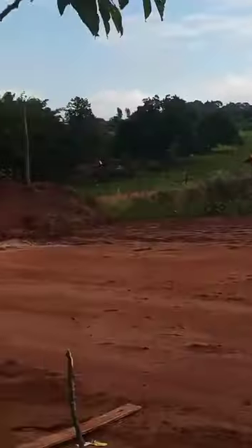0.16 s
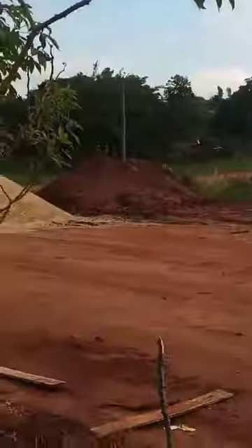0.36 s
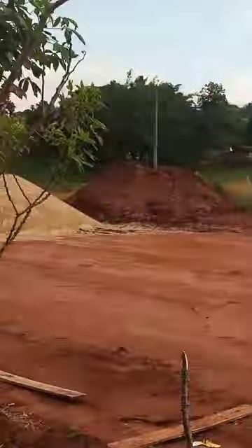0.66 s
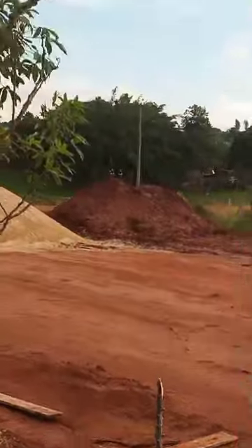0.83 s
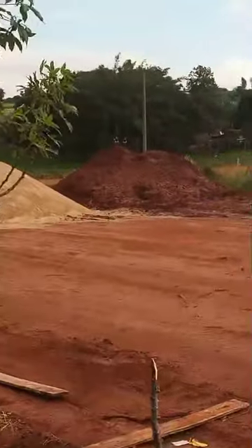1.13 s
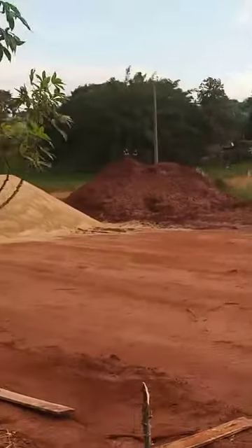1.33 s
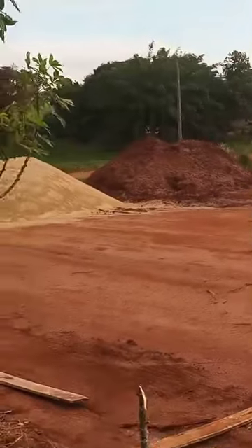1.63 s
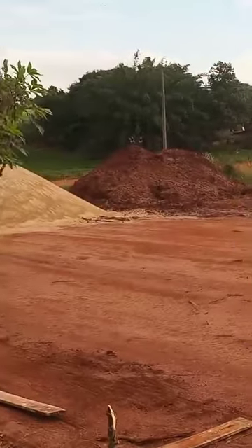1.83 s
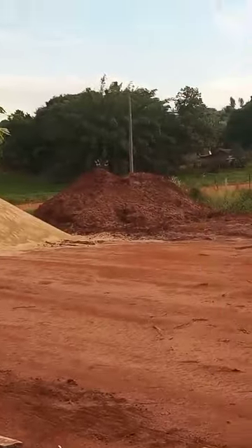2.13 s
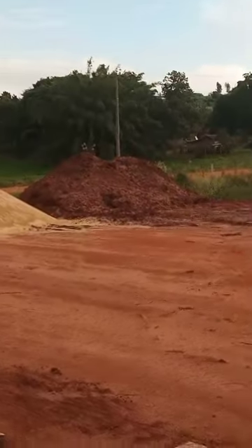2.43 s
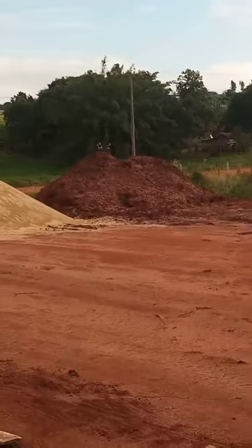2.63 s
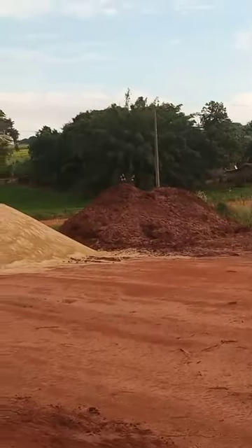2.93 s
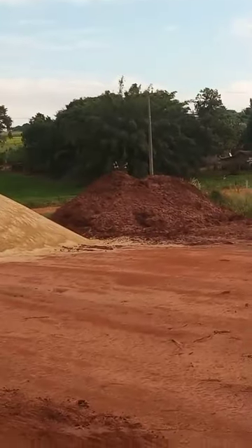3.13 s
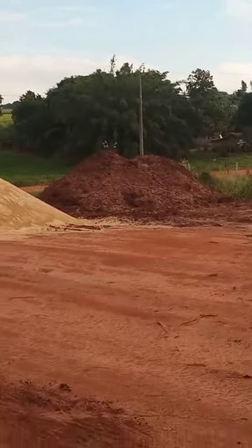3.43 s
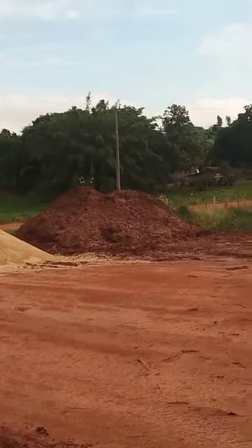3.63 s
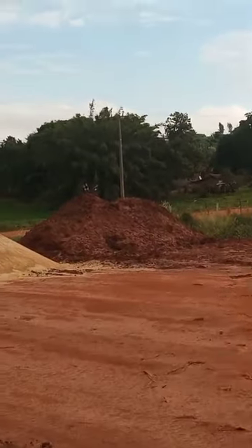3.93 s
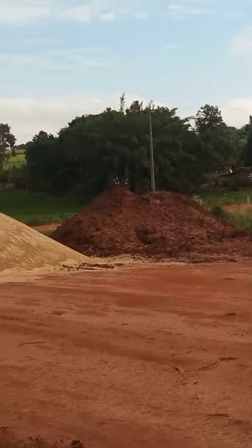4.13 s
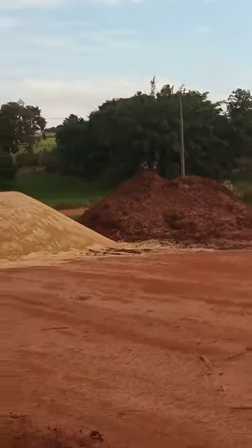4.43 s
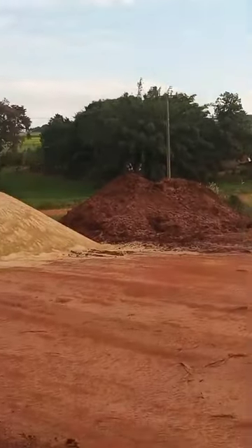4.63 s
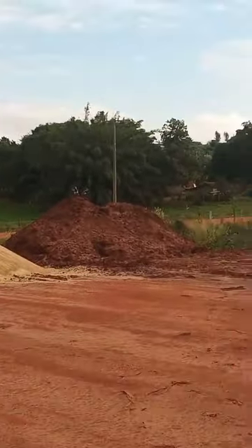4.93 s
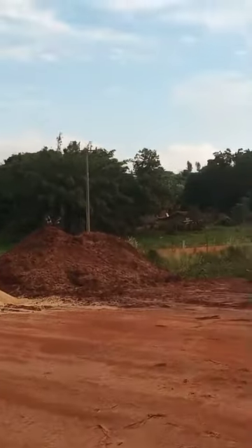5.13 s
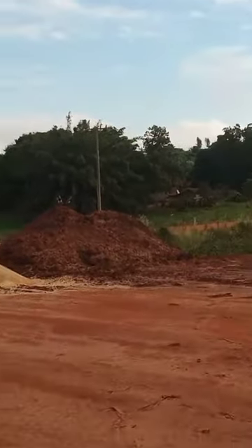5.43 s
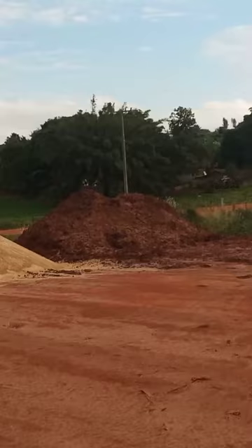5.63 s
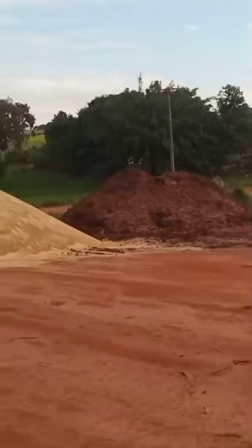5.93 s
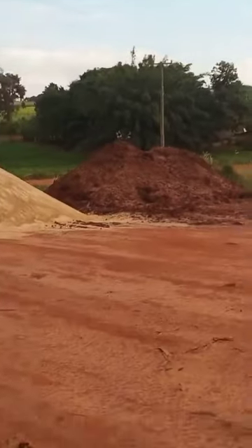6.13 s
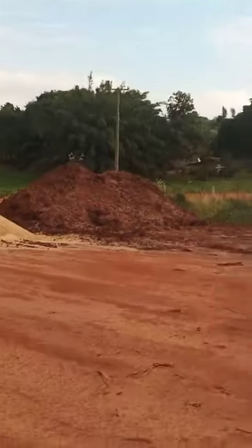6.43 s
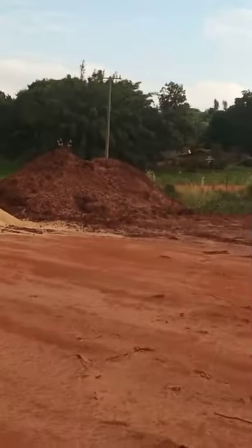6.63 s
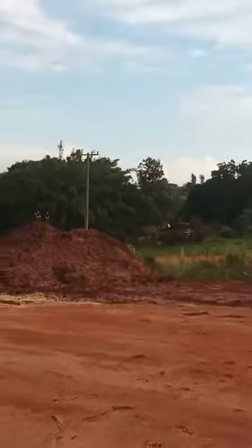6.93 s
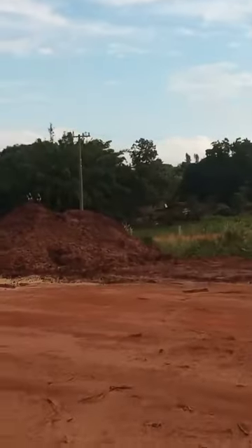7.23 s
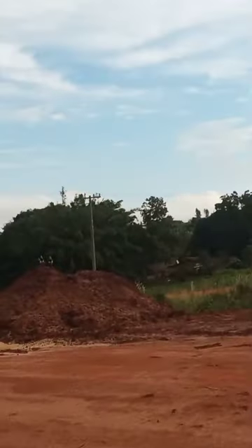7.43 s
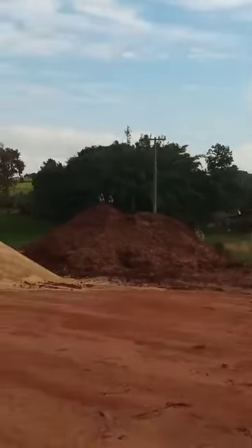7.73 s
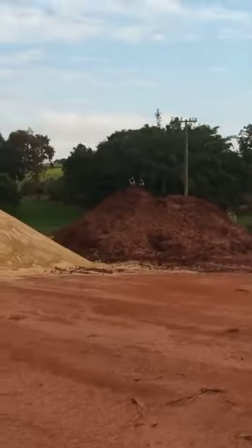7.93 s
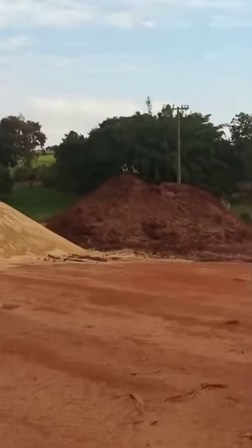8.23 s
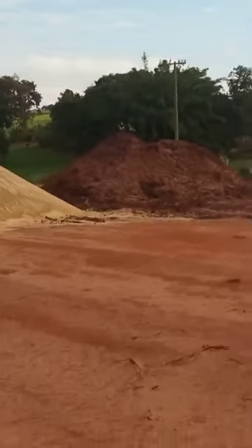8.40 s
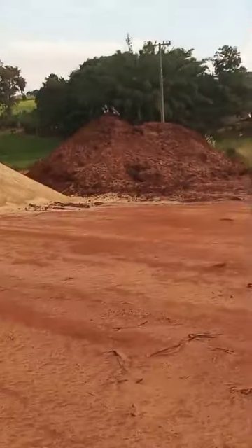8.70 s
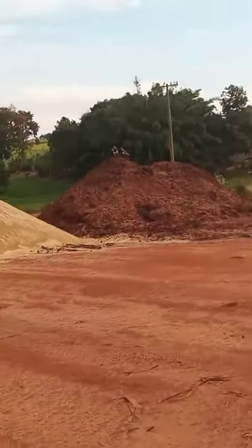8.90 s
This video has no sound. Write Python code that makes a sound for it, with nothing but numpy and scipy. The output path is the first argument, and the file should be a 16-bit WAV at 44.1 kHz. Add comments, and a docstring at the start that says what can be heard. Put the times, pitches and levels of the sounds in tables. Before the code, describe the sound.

A few lapwings scold from start to finish in an open outdoor space, over a very faint hiss of air. Their calls are short, shrill and reedy, about four a second, unevenly spaced and often overlapping. Each scoops upward, often with a rasp, then falls and breaks lower, leaving a light echo from the trees. Short, duller yelps fall between them from about 2.4 seconds. The calls grow gradually louder and peak around 7.7 to 8.3 seconds. Close by, feet faintly scuff and crackle on gritty earth at about 0.6, 2 and 6.7 seconds, with a soft dull knock near 7.4 seconds. Light wind buffets the microphone in low puffs around 3.9 and 4.5 seconds, then more noticeably from 8 seconds to the end at about 9 seconds. The birds stay the most prominent sound throughout.

```python
"""An open building site: a few lapwings scold, their shrill calls overlapping and echoing from the trees.
Each call is a stack of overtones coloured by throat and bill. It scoops up, stuttering into a rasp if
the lead-in is long, clears into a falling reedy note, then breaks to a lower register; short yelps
fall between. Close by, feet shift on gritty earth and a light wind buffets the microphone."""
import sys
import numpy as np
from scipy import signal
from scipy.fft import rfft, irfft, next_fast_len
from scipy.io import wavfile
from scipy.ndimage import uniform_filter1d, map_coordinates

SR = 44100
rng = np.random.default_rng(int(sys.argv[2]) if len(sys.argv) > 2 else 0)


def master_out(mix):
    """Clip the mix to full scale and print it as 16-bit PCM to the path in sys.argv[1]."""
    frames = np.transpose(np.atleast_2d(mix))
    ceiling = np.clip(frames, -1, 1)
    pcm = np.round(ceiling * 32767).astype(np.int16)
    wavfile.write(sys.argv[1], SR, pcm)


N = 399546

# scolding calls: t/s, lead-in/s, fall/s, top pitch/Hz, level/dB
SCOLDS = [(0.012, 0.031, 0.1, 1184, -32.5), (0.621, 0.046, 0.059, 1276, -31.5),
          (1.003, 0.014, .1, 1131, -32), (1.131, 0.027, 0.12, 1188, -41), (1.496, 0.03, .2, 1304, -41.5),
          (1.583, 0.0031, 0.029, 1256, -29), (1.752, 0.054, 0.12, 1237, -40),
          (2.135, 0.079, 0.068, 1288, -28.5), (2.16, 0.017, 0.091, 1145, -28.5),
          (2.631, 0.048, 0.12, 1183, -29.5), (2.703, 0.0028, 0.039, 1165, -25.5),
          (3.248, 0.022, 0.12, 1158, -30.5), (3.311, 0.032, 0.071, 1283, -29.5),
          (3.72, 0.031, .13, 1199, -29.5), (3.937, 0.077, 0.092, 1297, -29), (4.175, 0.026, .1, 1180, -28),
          (4.215, 0.03, 0.13, 1202, -27.5), (4.527, 0.11, 0.078, 1330, -27.5),
          (4.627, 0.094, 0.063, 1227, -26.5), (4.749, .035, 0.13, 1194, -26),
          (5.123, 0.047, 0.089, 1291, -27), (5.636, 0.046, 0.13, 1285, -30), (5.74, 0.034, 0.12, 1149, -28),
          (5.822, 0.036, .099, 1285, -29), (6.134, .06, .08, 1268, -26), (6.27, 0.022, .16, 1191, -27.5),
          (6.561, .07, .092, 1289, -29), (6.628, .051, 0.078, 1246, -25), (6.759, .039, .185, 1218, -28),
          (7.167, 0.087, .18, 1302, -29.5), (7.212, 0.051, 0.048, 1221, -23.5),
          (7.701, 0.055, 0.16, 1242, -24.5), (7.8, 0.056, 0.061, 1241, -18), (7.91, .09, 0.058, 1284, -33),
          (8.2, 0.039, 0.16, 1235, -23.5), (8.3, 0.061, 0.08, 1224, -23.5),
          (8.541, 0.094, 0.07, 1301, -29.5), (8.733, 0.036, 0.13, 1189, -26.5),
          (8.799, 0.057, 0.068, 1260, -25.5)]


def amp(db):
    """Decibels to amplitude."""
    return 10 ** (np.asarray(db) / 20)


def unit(x):
    """x at an rms of 1."""
    return x / np.sqrt(np.mean(x ** 2) + 1e-20)


def along(points, hz):
    """A curve through (f/Hz, value) points on a log frequency axis."""
    f, v = np.transpose(points)
    return np.interp(np.log(hz + 1), np.log(f + 1), v)


def wobble(rate, size):
    """A smooth random curve with `rate` knots a second."""
    knots = rng.standard_normal(int(size * rate / SR) + 4)
    return map_coordinates(knots, [np.arange(size) * rate / SR], mode="mirror")


def filtered(x, response):
    """Zero-phase EQ; `response` gives the gain at each frequency."""
    size = next_fast_len(len(x) + SR // 4)
    return irfft(rfft(x, size) * response(np.fft.rfftfreq(size, 1 / SR)), size)[:len(x)]


def noise(spectrum):
    """Noise of rms 1, coloured by (f/Hz, level/dB) points."""
    return unit(filtered(rng.standard_normal(N), lambda hz: amp(along(spectrum, hz))))


def add(track, start, sound):
    """Mix a sound in at `start` seconds."""
    part = track[max(round(start * SR), 0):][:len(sound)]
    part += sound[:len(part)]


def clock(length):
    """A time axis in seconds, at least 10 ms long."""
    return np.arange(int(max(length, .01) * SR)) / SR


def gate(t, rise, fall):
    """A linear fade in and out."""
    return np.clip(t / rise, 0, 1) * np.clip((t[-1] - t) / fall, 0, 1)


def calls(clear_rough=0.06, clearing_s=0.011, swell_db=-5, rasp_db=-2.5, dull_db=-3):
    """The voice swells and scoops up, rasping if that takes long, then clears into a falling note."""
    out = np.zeros(N)
    for start, lead, length, top_hz, top_db in SCOLDS:
        end_hz, fade_db, bright_db = strained_note(length, top_hz)
        t = clock(lead + length)
        onset = np.clip(1 - t / lead, 0, 1)
        fall = np.clip((t - lead) / length, 0, 1)
        pitch = top_hz * (1 - onset ** 2 / 9) + (end_hz - top_hz) * fall
        rasp_depth = np.clip(lead / 0.0152 - 2, 0, 1)  # lead-ins under 30 ms stay clean
        rasp = rasp_depth * np.clip((lead - t) / clearing_s, 0, 1)
        db = top_db - 1.5 + fade_db * fall + swell_db * onset ** 2 + rasp_db * rasp
        # even the clear note turns hoarse in patches
        hoarse = np.minimum(clear_rough * amp(13.3 * wobble(18.8, len(t))), .5)
        voice = syrinx(pitch, hoarse + rasp, bright_db + dull_db * np.maximum(rasp, onset))
        chop = 1 + rasp * (stutter(t) - 1)
        add(out, start, amp(db) * voice * chop * gate(t, 0.0026, 0.016))
    return out


def strained_note(length, top_hz, easy_hz=1145, strained_hz=1285, sag_hz_per_s=1520):
    """End pitch, fade and brightness: a higher call is more strained, so shriller and better held."""
    fade_db = np.interp(top_hz, [easy_hz, strained_hz], [-10, -3.5])
    bright_db = np.interp(top_hz, [easy_hz, strained_hz], [-3.5, 5])
    return top_hz - sag_hz_per_s * length, fade_db, bright_db


def syrinx(pitch, rough, bright_db, chaos=0.027, waver=0.00595, fading_db=6, count=13):
    """The bird's voice: roughness shakes the pitch and spreads each overtone into a narrow band."""
    size = len(pitch)
    shaken = pitch * (1 + waver * wobble(68.2, size) + chaos * rough * wobble(915, size))
    phase = 2 * np.pi * np.cumsum(shaken) / SR
    spread = np.minimum(rough, 1) / np.sqrt(2)
    voice = np.zeros(size)
    for k in range(1, count + 1):
        # each overtone swells and fades by itself, at random
        knots = rng.standard_normal(size // 1100 + 2)
        drift = np.interp(np.linspace(0, len(knots) - 1, size), np.arange(len(knots)), knots)
        db = bright_db * (k > 2) + fading_db / (1 + (k == 2)) * drift
        grain = np.sqrt(1 - spread ** 2) + spread * wobble(660, size)
        voice += amp(db) * grain * np.sin(k * phase + rng.uniform(0, 2 * np.pi))
    return np.sqrt(2) * voice


def stutter(t, first_hz=65, last_hz=115, depth_db=8):
    """Uneven bursts that quicken as the voice catches; each starts hard and dies."""
    rate = np.interp(t, [0, .05], [first_hz, last_hz]) * amp(2.64 * wobble(87, len(t)))
    bursts = amp(-depth_db * (np.cumsum(rate) / SR % 1))
    return unit(uniform_filter1d(bursts, size=60))


def breaks(drop_db=-6, fade_db=-10):
    """As a call runs out, the voice drops to a lower register and slides away."""
    out, t = np.zeros(N), clock(.055)
    slide = t / t[-1]
    for start, lead, length, top_hz, top_db in SCOLDS:
        end_hz, faded_db, _ = strained_note(length, top_hz)
        voice = syrinx(end_hz * (.74 - .17 * slide), rough=.15, bright_db=-6, count=8)
        db = top_db + faded_db + drop_db + fade_db * slide
        add(out, start + lead + length, amp(db) * voice * gate(t, .002, .008))
    return out


def yelps(gain_db=0.5):
    """Short calls whose pitch rises and falls in one arch; the lower ones are duller clucks."""
    # low-register calls: t/s, length/s, top pitch/Hz, level/dB
    cues = [(2.373, 0.061, 849, -35.5), (2.985, 0.057, 1019, -32), (3.065, .05, 950, -37),
            (3.318, 0.047, 1003, -34), (3.571, 0.065, 811, -30), (5.505, 0.059, 762, -30.5),
            (7.658, 0.064, 949, -35), (8.052, 0.072, 952, -35), (8.625, 0.054, 1086, -31),
            (8.897, 0.059, 1120, -31.5)]
    out = np.zeros(N)
    for start, length, top_hz, db in cues:
        t = clock(length)
        pitch = top_hz * (1 - .65 * (t / t[-1] - .4) ** 2)
        voice = syrinx(pitch, rough=0.27, bright_db=-9 + 0.0917 * (top_hz - 1000), count=9)
        add(out, start, amp(db + gain_db) * voice * gate(t, 0.0094, 0.017))
    return out


def catches(pitch_hz=1060, gain_db=5):
    """At the head of some calls the syrinx flutters for a moment and stops again."""
    # catches of the voice: t/s, level/dB
    cues = [(0.995, -36), (1.496, -31.5), (2.123, -38), (2.613, -36), (4.526, -28.5), (5.104, -32),
            (5.614, -35), (7.150, -30), (7.704, -32)]
    out, t = np.zeros(N), clock(0.014)
    for start, db in cues:
        voice = syrinx(np.full(len(t), pitch_hz), rough=.5, bright_db=-9)
        add(out, start, amp(db + gain_db) * voice * gate(t, 0.0075, 0.011))
    return out


def throat(voice):
    """Throat and bill resonate, most strongly near 2.4 kHz."""
    # formant curve: f/Hz, level/dB
    formants = [(500, -55.5), (1300, -22), (2000, -9), (2400, 0), (3000, -3.5), (3600, -10.5), (4200, -7),
                (5000, -8), (5600, -16), (6500, -10), (7300, -28), (8000, -46), (10000, -26.5),
                (12500, -54), (15300, -39)]
    return filtered(voice, lambda hz: amp(along(formants, hz)))


def trees(birds, predelay_s=.03, build_s=0.011):
    """The tree line sends back a diffuse, slowly dying echo."""
    # reverb time: f/Hz, t60/s
    decay = [(500, 0.67), (2400, 0.36), (6000, 0.67), (12000, 0.21)]
    hz, t, wash = signal.stft(rng.standard_normal(SR), SR, nperseg=256)
    envelope = amp(-60 * t / along(decay, hz)[:, None]) * (1 - np.exp(-t / build_s))
    tail = signal.istft(wash * envelope, SR, nperseg=256)[1]
    out = np.zeros(N)
    add(out, predelay_s, signal.fftconvolve(birds, tail / np.linalg.norm(tail)))
    return out


def feet(snap_t60=0.013):
    """Soles scrape the earth and snap single grains of grit."""
    # sole drags: middle t/s, half length/s, grit level/dB, earth level/dB
    scuffs = [(0.577, 0.053, -47.5, -57), (0.682, 0.038, -42.5, -65), (2.055, 0.057, -49, -63),
              (6.661, 0.034, -29, -50), (6.816, 0.04, -42.5, -47.5)]
    # snapping grains: t/s, level/dB
    snaps = [(0.5614, -37), (0.612, -32.5), (0.6984, -30), (2.0303, -30), (2.0443, -27), (5.5287, -35.5)]
    # colour of the grit: f/Hz, level/dB
    grit_eq = [(500, -24), (2500, -10.5), (4500, -5), (6500, 6), (8000, -15.5), (15500, -19)]
    now, t = np.arange(N) / SR, clock(.06)
    grit = unit(noise(grit_eq) * amp(4.3 * wobble(460, N)))
    earth = noise([(60, -33), (200, -4.5), (550, -3.5), (1000, -12.5), (2500, -10.5), (6000, -70)])
    out, snap_envelope = np.zeros(N), np.zeros(N)
    for middle, half, grit_db, earth_db in scuffs:
        swell = np.exp(-((now - middle) / half) ** 2)
        out += swell * (amp(grit_db) * grit + amp(earth_db) * earth)
    for start, db in snaps:
        add(snap_envelope, start, amp(db - 60 * t / snap_t60))
    return out + snap_envelope * noise(grit_eq)


def thuds(ring_cycles=9):
    """Dull knocks of soles, and two low thumps of wind on the microphone."""
    # sole knocks and, below 200 Hz, wind thumps: t/s, level/dB, f/Hz
    cues = [(1.051, -51, 433), (1.076, -46.5, 407), (3.55, -47, 470), (3.886, -43, 155), (4.459, -45, 145),
            (6.636, -45.5, 304), (7.379, -33.5, 467)]
    out, t = np.zeros(N), clock(.06)
    for start, db, hz in cues:
        envelope = amp(db + 11.5 - 60 * t * hz / ring_cycles) * gate(t, 0.0023, .01)
        add(out, start, envelope * np.sin(2 * np.pi * hz * t))
    return out


def wind(gain_db=-1):
    """Light puffs tumble over the microphone in lumps."""
    # strength of the puffs: t/s, level/dB
    puffs = [(0.0, -71.5), (0.75, -61), (0.88, -85), (3.18, -70.5), (3.86, -48), (4.41, -59.5), (4.46, -49),
             (4.54, -72), (4.59, -50), (4.79, -86.5), (6.13, -62.5), (6.23, -81), (6.71, -57),
             (7.24, -77.5), (7.42, -49), (7.55, -64), (8.1, -37.5), (8.38, -86), (8.45, -41), (8.58, -113),
             (8.73, -42), (9.06, -55)]
    # colour of the buffeting: f/Hz, level/dB
    rumble_eq = [(25, -54), (60, 4), (130, 0.5), (250, -21.5), (600, -70)]
    force = amp(gain_db + np.interp(np.arange(N) / SR, *np.transpose(puffs)))
    return force * unit(noise(rumble_eq) * amp(3.2 * wobble(30, N)))


def air(level_db=-67):
    """The faint, slowly shifting hiss of open country."""
    # colour of the hiss: f/Hz, level/dB
    hiss_eq = [(30, -29), (90, 3), (220, -8), (700, -6.5), (1050, -8), (1500, -7), (2400, -7.5),
               (6600, -2.5), (7800, -19), (15500, -25)]
    return noise(hiss_eq) * amp(level_db + 3 * wobble(3, N))


def scene(echo_db=-15.5):
    """Birds and their echo up front, over feet, wind and a bed of air."""
    birds = throat(calls() + breaks() + yelps() + catches())
    return birds + amp(echo_db) * trees(birds) + feet() + thuds() + wind() + air()


def record(dry, knee_db=-25.5, window_s=0.023, top_hz=15850):
    """The phone's gain control holds down the loudest calls; nothing is kept above its band limit."""
    power = np.abs(uniform_filter1d(dry ** 2, int(window_s * SR)))
    held = dry / np.sqrt(np.hypot(1, power / amp(knee_db) ** 2))
    return filtered(held, lambda hz: hz < top_hz)


dry = scene()
out = record(dry)
master_out(out)
```